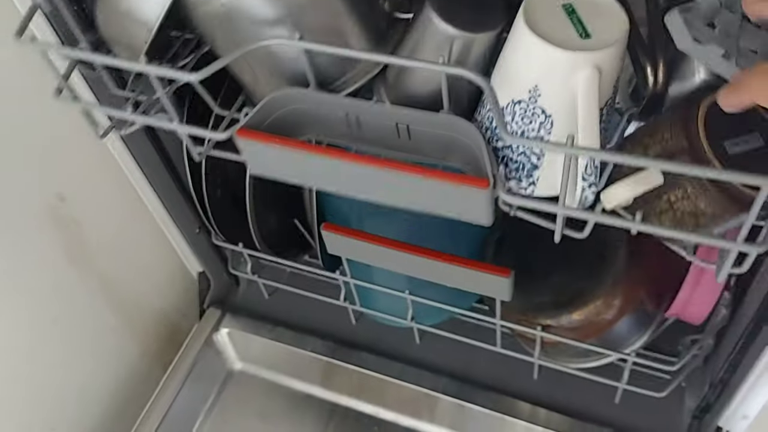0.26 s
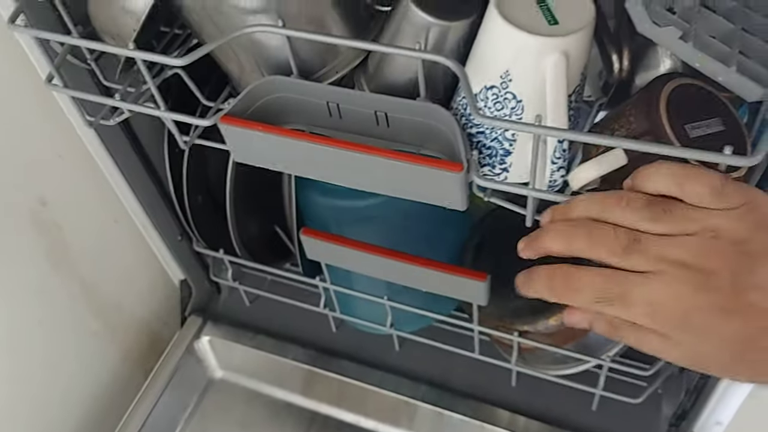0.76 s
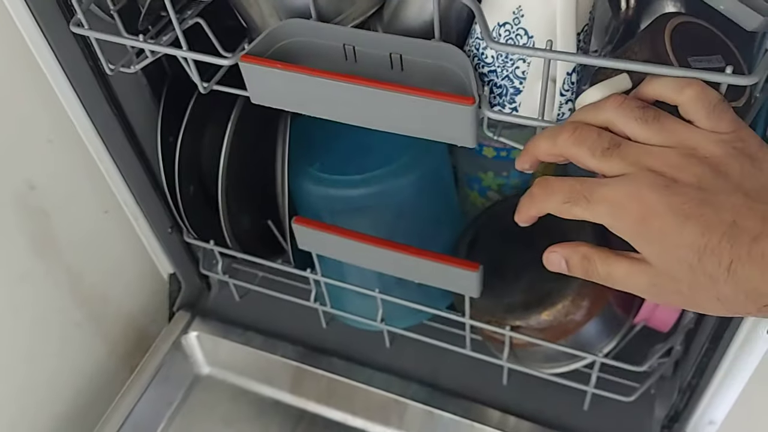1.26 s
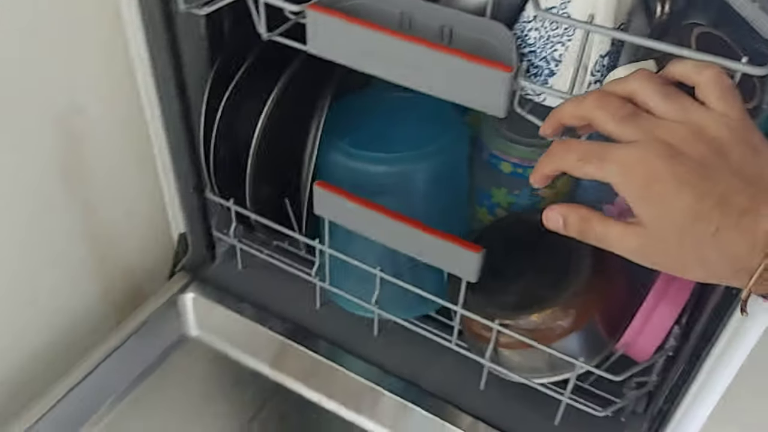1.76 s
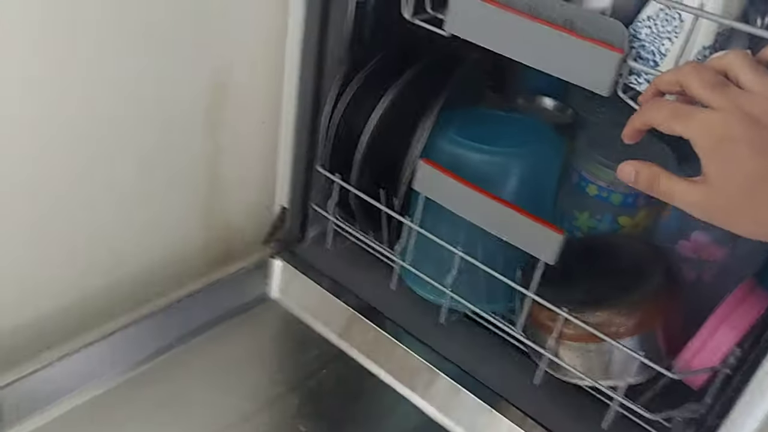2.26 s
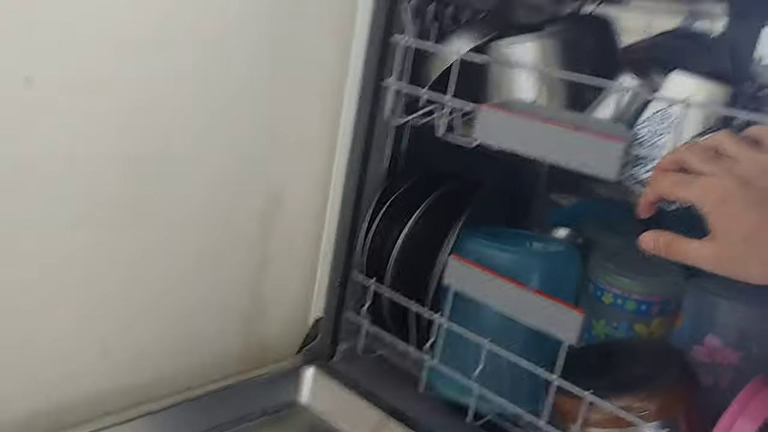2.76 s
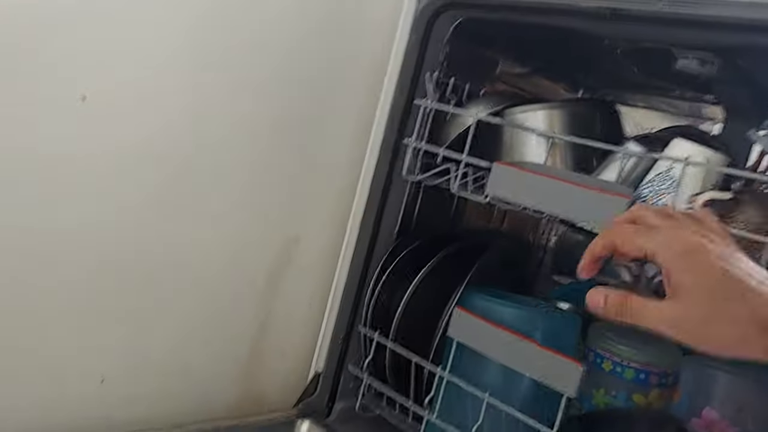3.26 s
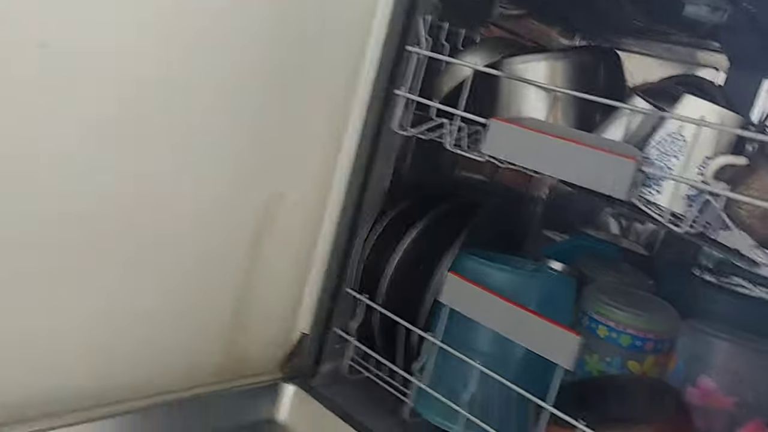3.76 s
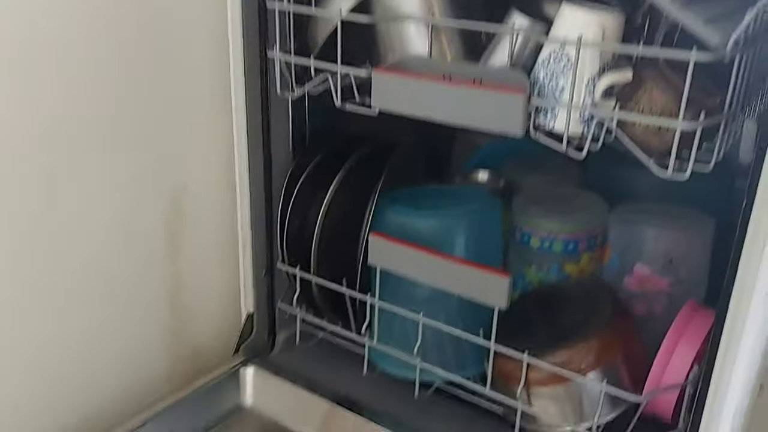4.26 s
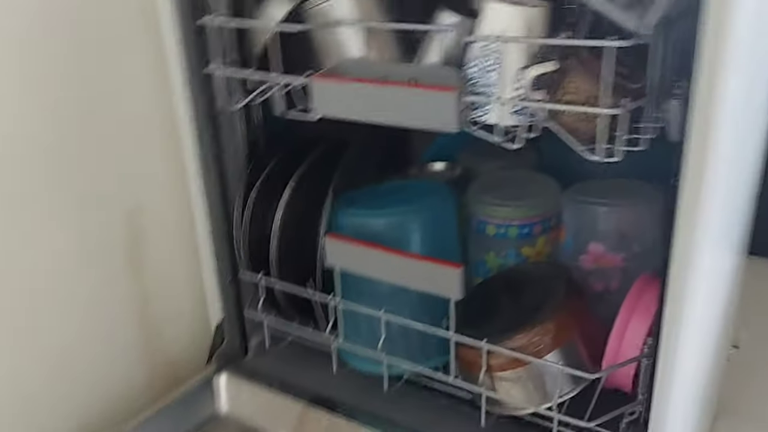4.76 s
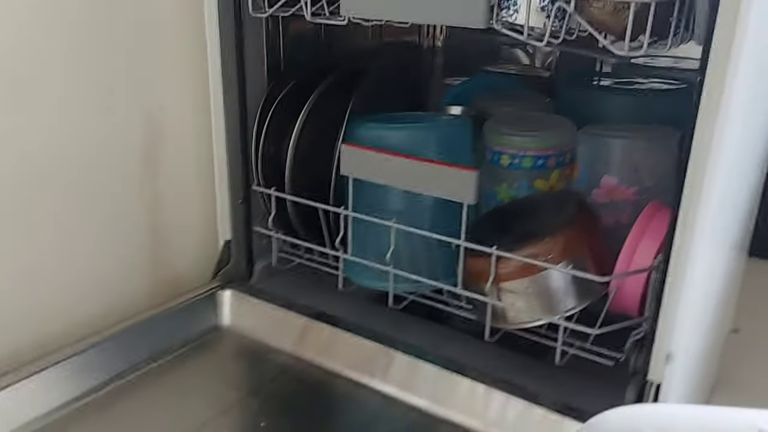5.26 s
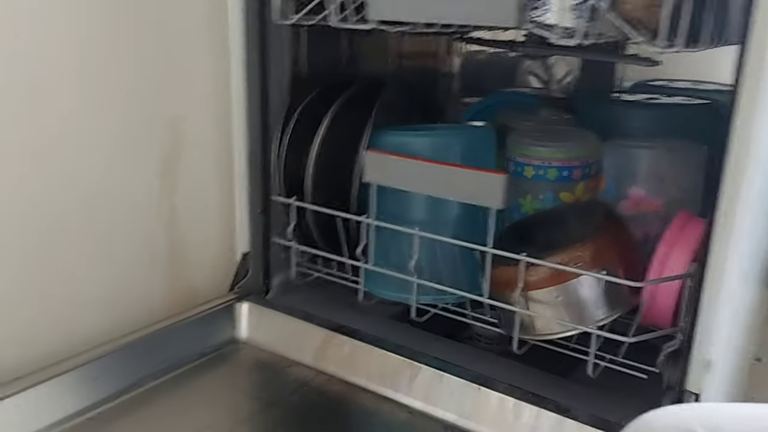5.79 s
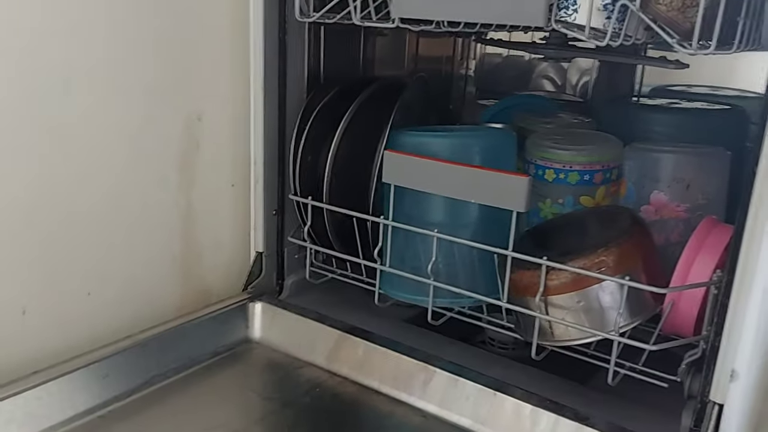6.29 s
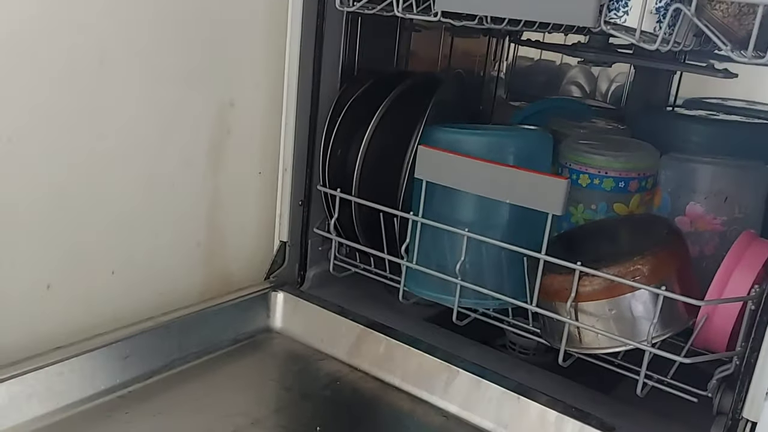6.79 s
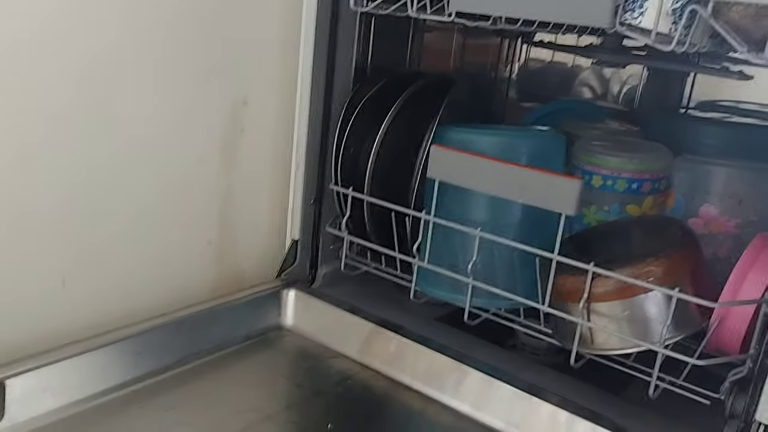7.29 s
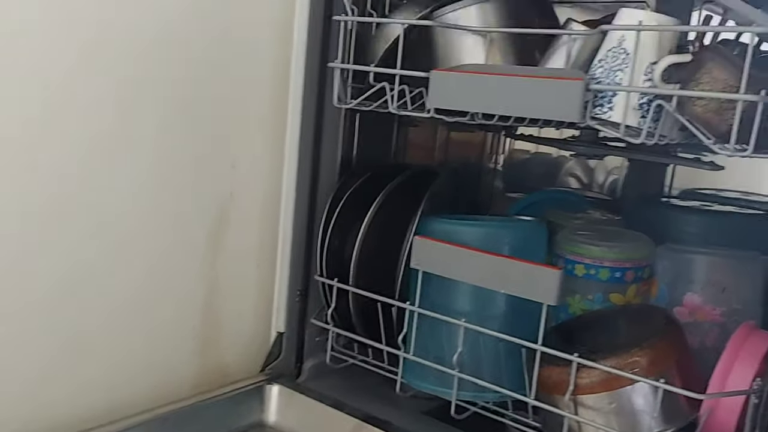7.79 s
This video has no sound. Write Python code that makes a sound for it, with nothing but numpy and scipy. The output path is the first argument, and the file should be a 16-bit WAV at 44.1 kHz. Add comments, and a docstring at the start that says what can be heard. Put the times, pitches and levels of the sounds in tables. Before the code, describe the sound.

Wire rack full of dishes rumbles and bangs home with a deep tub boom, followed by scattered steel clunks, ringing pan knocks and small clicks.

```python
"""Loading a dishwasher

A loaded wire dish rack rolls in, scrapes, and bumps against its stop with a boom of the tub.
Sheet steel clunks, a pan clangs, small parts click, and two sharp clacks ring in a hard-walled kitchen.
Blows are noise bursts shaped by a body's spectrum, some with dying sines; friction is grainy noise.
Dishes and cutlery ring as sines; a thin hiss, a hum and soft room noise lie under it, in close stereo.
"""
import sys
import numpy as np
from scipy import signal
from scipy.fft import rfft, irfft, next_fast_len
from scipy.io import wavfile
from scipy.ndimage import uniform_filter1d

SR = 44100
rng = np.random.default_rng(int(sys.argv[2]) if len(sys.argv) > 2 else 0)


def put_to_file(sound):
    """Save the sound as 16-bit audio at rate SR, in the file named by the first command-line argument."""
    columns = np.atleast_2d(sound).T  # one column per channel
    safe = np.clip(columns, -1, 1)
    whole_steps = np.round(safe * 32767)
    wavfile.write(sys.argv[1], SR, whole_steps.astype(np.int16))


N = 354563

# Room noise spectrum. Each row: frequency in Hz, relative level in dB per Hz.
FLOOR_SPECTRUM = [(15, -43.5), (25, -35), (59, 3.5), (97, -6), (149, -6), (170, -20.5), (200, -6.5),
                  (229, -11), (293, -10), (575, -12.5), (659, -15), (1190, -18), (1440, -20),
                  (10700, -37.5), (16000, -53)]
FLOOR_DB = -56.5  # rms, before the swell
# Slow swell of room noise and hum. Each row: time in seconds, gain in dB.
FLOOR_SWELL = [(0, 10.5), (2.9, 3.5), (4, 3), (5.9, 2), (7.3, -1.5), (7.85, -1), (8.03, 6)]
# Mains hum. Each row: frequency in Hz, rms level in dB before the swell.
HUM = [(149, -77), (201, -71.5), (300, -72.5)]
# Decay of the kitchen's reflections. Each row: frequency in Hz, t60 in seconds.
KITCHEN_DECAY = [(60, 0.64), (200, 0.54), (500, 0.49), (1000, 0.46), (2500, 0.47), (6000, 0.48),
                 (15000, 0.36)]
# Likeness of the two channels. Each row: frequency in Hz, likeness from 0 to 1.
STEREO_LIKENESS = [(60, 0.79), (150, 0.77), (300, 0.92), (480, 0.3), (700, 0.28), (1400, 0),
                   (16000, 0.0092)]

# Thin high hiss, faint and steady at first, with stronger short swells.
# Each row: start in seconds, length in seconds, rms level in dB.
HISS_STRETCHES = [(0, 3.24, -69), (3.45, .85, -68.5), (4.55, 0.11, -59), (4.89, 0.5, -54.5),
                  (5.21, 0.022, -49), (5.42, 0.14, -52), (5.65, 0.29, -68.5), (6.78, 0.29, -57)]
HISS_ATTACK_S, HISS_RELEASE_S = 0.0089, 0.031
# Stiff rubs. Each row: peak time, rise and fall in seconds, level at the peak in dB, hardness in dB.
RUBS = [(1.974, 0.0039, 0.049, -44.5, 18), (2.014, 0.0046, 0.03, -42.5, 11),
        (2.055, 0.0088, 0.046, -44, 13), (6.885, 0.013, 0.063, -48.5, 12), (6.99, .07, 0.1, -42.5, 2),
        (7.08, 0.042, 0.071, -45.5, 3.5)]
# Scrapes and scuffs. Each row: peak time, rise and fall in seconds, level at the peak in dB, hardness in dB.
STROKES = [(0.514, .0012, 0.027, -39, 2.5), (0.615, 0.074, 0.098, -35, 4), (1.573, .003, 0.22, -47.5, 4.5),
           (1.755, 0.11, 0.083, -39.5, 1), (6.37, 0.04, 0.2, -37.5, 3.5)]
# Stick-slip squeaks. Each row: start in seconds, length in seconds, pitch in Hz, peak level in dB,
# rms unsteadiness as a share of the pitch.
SQUEAKS = [(0.555, 0.039, 590, -38.5, 0.047), (0.864, 0.04, 523, -28.5, 0.069),
           (0.93, 0.015, 370, -32, 0.02), (0.941, 0.026, 455, -37, 0.018),
           (2.227, 0.052, 338, -33.5, 0.092)]

# Dishes touching. Each row: start in seconds, level in dB before the mode levels, lowest mode in Hz,
# t60 of that mode in seconds.
CLINKS = [(0.001, -42.5, 1660, 0.26), (0.004, -48.5, 2840, 0.48), (0.245, -43, 7000, 0.16),
          (2.36, -52, 2590, 0.21), (4.666, -47, 2290, 0.055), (4.874, -38, 1567, .07),
          (4.969, -31.5, 1497, 0.064)]
# Modes of a dish. Each row: multiple of the lowest mode, relative level in dB.
DISH_MODES = [(1, 6), (1.016, -8), (1.19, -9), (1.474, -7.5), (2.56, -25)]
# Every jolt rings a mug; its level is relative to the jolt, plus MUG_PER_HARDNESS dB per dB of hardness.
MUG_HZ, MUG_SCATTER, MUG_T60_S, MUG_DB, MUG_PER_HARDNESS = 2566, 0.0273, 0.21, -20.5, 1
# Cutlery level relative to the jolts and to the rolling rumble.
CUTLERY_JOLT_DB, CUTLERY_ROLL_DB, CUTLERY_SETTLE_S = -25, -18, .1

# Blows share one layout. Each row: start in seconds, rms level of the first 30 ms in dB, hardness in dB.
# Small dry clicks close by, rows as above.
CLICKS = [(0.246, -45.5, 18), (0.451, -48, -7), (2.011, -53, -5), (2.228, -51.5, -1), (4.667, -46.5, -12),
          (5.533, -39, -8.5), (5.56, -54, 9), (5.688, -33.5, -12)]
# A woody knock, rows as above.
KNOCKS = [(7.89, -35.5, 1.5)]
# A bright snap out in the room, rows as above.
SNAPS = [(6.393, -29, 4.5), (6.399, -19, -6), (6.413, -24.5, -8)]
# Hard clacks with a hollow ring, rows as above.
CLACKS = [(6.1528, -26.5, -4.5), (6.1608, -24.5, 3)]
# A steel pan is knocked, or lands and chatters, rows as above.
CLANGS = [(2.411, -29, -14), (4.1015, -24.5, 8.5), (4.111, -25.5, -5), (4.125, -25, 7), (4.135, -23, -8),
          (4.617, -39, -3), (4.976, -31.5, -1)]
# Clunks of sheet steel, rows as above.
CLUNKS = [(0.453, -41.5, -38), (0.906, -38.5, -10), (2.228, -43, -11), (2.404, -26.5, 1.5),
          (2.504, -34, 11), (2.531, -37, 16), (2.585, -34, -8), (2.608, -33.5, -3), (4.503, -30.5, 6.5),
          (4.615, -42, 3), (4.664, -40.5, 6), (4.873, -34, 13.5), (4.969, -26, 3)]
# Jolts of the loaded rack, hardest at its stop, with a weaker one later, rows as above.
JOLTS = [(0.002, -35.5, 6), (0.108, -37, -23), (0.244, -37, -12), (0.276, -40.5, -28), (0.35, -34, -8.5),
         (1.085, -37.5, -10), (1.115, -20.5, 11), (1.143, -23, -4.5), (1.177, -34.5, -19), (2.28, -39, -22)]
# Treble follows hardness; the middle gets this share of it.
MIDDLE_SHARE = 0.34
# Each clunk rebounds at once, then settles in duller, weaker taps.
REBOUND_S, REBOUND_DB, REBOUND_HARDNESS_DB = .007, -2.2, -18.5
SETTLE_GAP_S, SETTLE_DB_PER_TAP = .036, -8.5

# Rolling on the wheels. Each row: start in seconds, length in seconds, rumble rms in dB,
# squeal amplitude in dB before its flutter.
ROLLS = [(0, 0.319, -37.5, -60.5), (0.96, 0.2, -56.5, -67), (2.269, .12, -44, -90)]
ROLL_ATTACK_S, ROLL_RELEASE_S = 0.011, 0.025
SQUEAL_HZ = 9100

# Body spectra share one layout. Each row: frequency in Hz, relative level in dB per Hz.
# Thin high hiss, rows as above.
HISS_SPECTRUM = [(100, -11), (2000, -6.5), (5500, -5.5), (7400, 2), (9500, -3.5), (16000, -5.5)]
# Stiff rub, rows as above.
RUB_SPECTRUM = [(35, -23), (60, 2), (150, -7.5), (260, -3), (480, -3.5), (750, -5), (1000, -3), (1120, -5),
                (1800, -6.5), (2500, -11), (7000, -30.5), (16000, -41)]
# Scuffs and wheel rumble, rows as above.
SCUFF_SPECTRUM = [(30, -12), (80, 8.5), (200, -3), (600, 1), (1200, -7.5), (2500, -9), (4500, -15),
                  (7500, -20), (16000, -30)]
# Small plastic parts, rows as above.
PLASTIC_SPECTRUM = [(40, -9), (150, 0), (500, -6), (1200, -23), (2300, -14.5), (3500, -7.5), (5500, -12),
                    (7500, -11), (10000, -14.5), (16000, -21.5)]
# Woody body, rows as above.
WOODY_SPECTRUM = [(35, -19), (70, -6), (370, -4), (503, -2.5), (682, -13), (862, -1.5), (1170, -17.5),
                  (1740, -12.5), (2400, -17), (3340, -6), (3760, -16), (4120, -12), (5330, -21),
                  (16000, -49)]
# Bright snapping body, rows as above.
BRIGHT_SPECTRUM = [(100, -39.5), (350, -14.5), (650, -0.5), (1000, -12.5), (1600, -6.5), (2700, 3),
                   (4000, 5), (6000, 3), (7400, 7.5), (9500, 5), (16000, 1.5)]
# Hollow body, rows as above.
HOLLOW_SPECTRUM = [(100, -31.5), (500, -19.5), (1300, -13), (1800, -2.5), (2150, 5), (2600, -2.5),
                   (3600, -8.5), (5500, -9), (8000, -20), (16000, -19.5)]
# Steel pan, rows as above.
PAN_SPECTRUM = [(40, -30), (120, -28), (170, -6.5), (230, -19), (350, -6), (450, -12.5), (800, -1.5),
                (1050, 5.5), (1200, -8), (1550, -11), (1800, -21), (2350, -15.5), (3200, -25.5),
                (6000, -34.5), (7400, -34), (9000, -39), (16000, -50)]
# Sheet steel, rows as above.
STEEL_SPECTRUM = [(40, -22), (90, -7.5), (135, -12), (190, 2), (250, -8), (340, 3), (450, -5.5), (570, -1),
                  (740, -1), (880, -5.5), (1030, -6.5), (1300, -10), (1600, -13.5), (1950, -17),
                  (2500, -20.5), (3500, -25.5), (6000, -37.5), (7300, -26.5), (9000, -37.5), (16000, -42.5)]
# Loaded wire rack, rows as above.
RACK_SPECTRUM = [(30, -16), (80, 4.5), (125, -9.5), (170, 1), (215, -2.5), (330, -3), (600, -4), (1000, -9),
                 (1400, -17), (2200, -13.5), (2600, -11.5), (3200, -14), (6000, -29), (7400, -25.5),
                 (9000, -34), (16000, -33)]

# Ringing modes of the pan. Each row: frequency in Hz, relative level in dB, t60 in seconds.
PAN_MODES = [(162, -21, 0.36), (349.5, -8.5, 0.59), (535, -7.5, 0.54), (670, -7, 0.66), (880, -22, 0.35),
             (964, -0.5, 0.43), (990, 0, .4), (1020, 6, 0.28), (1078, -3.5, .38), (1116, 1.5, 0.45),
             (1330, -12, 0.27), (2159, -4.5, 0.14), (2380, -5, 0.25), (2670, -16, 0.24)]
# Ringing modes of sheet steel. Each row: frequency in Hz, relative level in dB, t60 in seconds.
STEEL_MODES = [(167.2, -4.5, 0.58), (197.6, 0, 0.82), (313, -3, 0.68), (352.3, 11.5, 0.41),
               (347, -11, 0.89), (529, -1, 0.64), (620, 8, 0.32), (639, 7, 0.44), (740, 13.5, 0.39),
               (970, -15, 0.64), (1022, 15, 0.33)]
# Ringing modes of the rack. Each row: frequency in Hz, relative level in dB, t60 in seconds.
RACK_MODES = [(170, -24, .2), (205.6, -1, 0.27), (268.3, 9.5, 0.52), (593, 4, 0.45), (635, 5, 0.3),
              (770, -18, 0.33)]
# Boom of the tub. Each row: frequency in Hz, level in dB relative to the jolt.
TUB_MODES = [(44, -7), (68.7, 6.5), (86, -13.5)]

EDGE_HZ = 15950  # upper band limit of the recorder


def gain_of(db):
    """Decibels to a factor."""
    return 10 ** (np.asarray(db) / 20)


def rms(x):
    """Root mean square."""
    return np.sqrt(np.mean(x ** 2) + 1e-20)


def read(points, hz):
    """Joins (Hz, value) points on a log-frequency axis."""
    f, value = np.transpose(points)
    return np.interp(np.log(hz + 1), np.log(f + 1), value)


def add(mix, s, sound):
    """Mixes a sound in at time s."""
    part = mix[:, max(round(s * SR), 0):][:, :sound.shape[-1]]
    part += sound[..., :part.shape[1]]


def held(rows, attack_s, release_s):
    """Level of sounds (start s, length s, dB) that get going, hold and die away."""
    t = np.arange(N) / SR
    level = np.zeros(N)
    for s, length, db in rows:
        attack = np.clip((t - s) / attack_s, 0, 1)
        release = np.exp(-np.maximum(t - s - length, 0) / release_s)
        level += gain_of(db) * attack * release
    return level


def diffuse(size):
    """White noise at two microphones: alike in the bass, unrelated in the treble."""
    a, b = rfft(rng.standard_normal((2, size)))
    same = np.clip(read(STEREO_LIKENESS, np.fft.rfftfreq(size, 1 / SR)), -1, 1)
    mid = a * np.sqrt((1 + same) / 2)
    side = b * np.sqrt((1 - same) / 2)
    return irfft([mid + side, mid - side], size)


def colour(x, spectrum, size=4096):
    """Causal, minimum-phase filter of unit energy with the given spectrum."""
    log_gain = np.log(gain_of(read(spectrum, abs(np.fft.fftfreq(size, 1 / SR)))))
    taps = np.fft.ifft(np.exp(np.conj(signal.hilbert(log_gain)))).real[:size // 2]
    return signal.fftconvolve(x, taps[None] / np.linalg.norm(taps), axes=1)[:, :x.shape[1]]


def tint(x, hardness_db, bass_db, middle_db):
    """A harder touch brightens the sound; bass and middle depend on where the body is touched."""
    middle = middle_db + MIDDLE_SHARE * hardness_db
    return colour(x, [(90, bass_db), (380, 0.0011), (620, middle / 2), (1050, middle), (4000, hardness_db)])


def uneven(spectrum, ripple_db):
    """A body has many small resonances on top of its broad spectrum: random ripple, less in the bass."""
    hz = np.arange(0, SR / 2, 10)
    coarse = hz[::5]
    ripple = np.interp(hz, coarse, rng.standard_normal(len(coarse))) * np.minimum(hz / 1500, 1)
    return np.column_stack([hz, read(spectrum, hz) + ripple_db * ripple])


def room_tail(size):
    """Dense reflections, each band dying at its own speed."""
    hz, t, bands = signal.stft(diffuse(size), SR, nperseg=256)
    decay = gain_of(-60 * t / read(KITCHEN_DECAY, hz)[:, None])
    return signal.istft(bands * decay, SR)[1][:, :size]


def ringing(modes, t):
    """Dying sines; the high ones reach the two microphones out of step."""
    out = np.zeros((2, len(t)))
    for hz, db, t60 in modes:
        phase, skew = rng.uniform(-np.pi, np.pi, 2)
        skew *= (1 - read(STEREO_LIKENESS, hz)) / 2
        tone = np.sin(2 * np.pi * hz * t + phase + np.array([[skew], [-skew]]))
        out += gain_of(db - 60 * t / t60) * tone
    return out


def blows(rows, spectrum, bass_db, middle_db, pan_db, rise_s, contact_s, room_db, ripple_db,
          modes=(), modes_db=0, size=28672):
    """Each blow: a short noise burst of contact, the body's modes and the room, levelled on its first 30 ms."""
    out, t = np.zeros((2, N)), np.arange(size) / SR
    head = round(.03 * SR)
    body = uneven(spectrum, ripple_db)
    for s, db, hardness_db in rows:
        contact = diffuse(size) * np.exp(-t / contact_s)
        noise = contact + gain_of(room_db) * room_tail(size)
        sound = colour(noise * (1 - np.exp(-t / rise_s)), body)
        sound = tint(sound + gain_of(modes_db) * ringing(modes, t), hardness_db, bass_db, middle_db)
        sides = gain_of([[db + pan_db / 2], [db - pan_db / 2]])  # positive pan leans left
        add(out, s, sides * sound / rms(sound[:, :head]))
    return out


def rubbing(rows, spectrum, bass_db, middle_db, grain_db, slips_per_s, ripple_db):
    """Each stroke swells and fades; tiny uneven slips make it grainy."""
    out, body = np.zeros((2, N)), uneven(spectrum, ripple_db)
    for s, rise, fall, db, hardness_db in rows:
        start = max(s - 2 * rise, 0)
        t = start + np.arange(next_fast_len(int((s + 3 * fall - start) * SR))) / SR
        slips = np.interp(t * slips_per_s % 4096, np.arange(4096), rng.standard_normal(4096))
        grainy = diffuse(2 ** 17)[:, :len(t)] * gain_of(grain_db * slips)
        sound = tint(colour(grainy, body), hardness_db, bass_db, middle_db)
        pressure = np.exp(-((t - s) / np.where(t < s, rise, fall)) ** 2)
        add(out, start, gain_of(db) * pressure * sound / rms(sound))
    return out


def grainy_noise(spectrum, grain_db, ripple_db):
    """Continuous noise with a finely uneven level, coloured by a spectrum."""
    grain = uniform_filter1d(rng.standard_normal(N), size=120)
    noise = diffuse(next_fast_len(N))[:, :N] * gain_of(grain_db * grain / rms(grain))
    return colour(noise, uneven(spectrum, ripple_db))


def background(wander_db):
    """Room noise that wanders very slightly and a faint mains hum, both under one slow swell."""
    t = np.arange(N) / SR
    wander = sum(np.sin(2 * np.pi * (f * t + rng.random())) / np.sqrt(f) for f in np.geomspace(1, 9, 12))
    air = colour(diffuse(next_fast_len(N)), FLOOR_SPECTRUM)[:, :N]
    air = air * gain_of(wander_db * wander / rms(wander))
    hum = np.zeros(N)
    for hz, db in HUM:
        hum += gain_of(db) * np.sqrt(2) * np.sin(2 * np.pi * (hz * t + rng.random()))
    swell = gain_of(np.interp(t, *np.transpose(FLOOR_SWELL)))
    return (gain_of(FLOOR_DB) * air / rms(air) + hum) * swell


def thin_hiss():
    """Thin, finely grained high hiss, faint and steady at first, with stronger short swells."""
    hiss = grainy_noise(HISS_SPECTRUM, grain_db=0.5, ripple_db=4.0)
    return hiss / rms(hiss) * held(HISS_STRETCHES, HISS_ATTACK_S, HISS_RELEASE_S)


def stiff_rubs():
    """Stiff rubs: coarse, slow slips that colour the noise with the rubbed body."""
    return rubbing(RUBS, RUB_SPECTRUM, bass_db=1.0, middle_db=-1.2, grain_db=1.0, slips_per_s=370,
                   ripple_db=3.0)


def scrapes():
    """Scrapes and soft scuffs: strokes of quicker slips on a bass-heavy body."""
    return rubbing(STROKES, SCUFF_SPECTRUM, bass_db=-3, middle_db=3.2, grain_db=1.5, slips_per_s=700,
                   ripple_db=3.0)


def squeaks():
    """Stick and slip on the rails: short unsteady tones."""
    out = np.zeros((2, N))
    for s, length, hz, db, unsteady in SQUEAKS:
        waver = uniform_filter1d(rng.standard_normal(SR), size=60)[:int(length * SR)]
        turns = np.cumsum(hz * (1 + unsteady * waver / rms(waver))) / SR
        add(out, s, gain_of(db) * signal.windows.tukey(len(turns), .5) * np.sin(2 * np.pi * turns))
    return out


def cutlery_rattle(ticks_per_s, low_hz, high_hz, spread_db, count=40):
    """Cutlery and coated wires tick at random as the rack rolls or is jolted, each with its own pitch."""
    span = 3 * SR
    out, t = np.zeros((2, N)), np.arange(SR // 4) / SR
    for hz in np.geomspace(low_hz, high_hz, count) * rng.uniform(.95, 1.05, count):
        struck = rng.random(span) < ticks_per_s / count / SR
        ticks = struck * gain_of(spread_db * rng.standard_normal(span))
        t60 = 45 / hz  # higher pieces die sooner
        add(out, 0, signal.fftconvolve(ticks[None], ringing([(hz, 0, t60)], t), axes=1))
    jolted = held([(s, 0, db + CUTLERY_JOLT_DB) for s, db, _ in JOLTS], ROLL_ATTACK_S, CUTLERY_SETTLE_S)
    return out / rms(out[:, :span]) * np.hypot(jolted, gain_of(CUTLERY_ROLL_DB) * roll_level())


def clinks():
    """Dishes ring with close and far modes, the higher dying sooner; hard jolts ring the mug most."""
    out, t = np.zeros((2, N)), np.arange(SR // 2) / SR
    mug = []
    for s, db, hardness_db in JOLTS:
        mug_db = db + MUG_DB + MUG_PER_HARDNESS * hardness_db
        mug.append((s, mug_db, MUG_HZ * (1 + MUG_SCATTER * rng.uniform(-1.15, 1)), MUG_T60_S))
    for s, db, hz, t60 in CLINKS + mug:
        modes = [(hz * k, db + mode_db, t60 / k) for k, mode_db in DISH_MODES if hz * k < SR / 2]
        add(out, s, ringing(modes, t))
    return out


def plastic_clicks():
    """Small parts click: brief contact and little room."""
    return blows(CLICKS, PLASTIC_SPECTRUM, bass_db=4, middle_db=14.5, pan_db=0.3, rise_s=0.001,
                 contact_s=0.006, room_db=-18.0, ripple_db=3.5)


def woody_knock():
    """A woody knock: a fast, dry contact coloured by the body's resonances."""
    return blows(KNOCKS, WOODY_SPECTRUM, bass_db=-2.0, middle_db=3, pan_db=-2.0, rise_s=0.00014,
                 contact_s=0.0036, room_db=-22, ripple_db=1.5)


def bright_snaps():
    """A bright snap: contact under a millisecond, followed by the room."""
    return blows(SNAPS, BRIGHT_SPECTRUM, bass_db=15.5, middle_db=0.3, pan_db=.4, rise_s=.0001,
                 contact_s=0.0006, room_db=-7, ripple_db=1.0)


def hollow_clacks():
    """Hard clacks: a sudden contact on a hollow body, with a strong room tail."""
    return blows(CLACKS, HOLLOW_SPECTRUM, bass_db=-1.5, middle_db=0.8, pan_db=-.2, rise_s=.0002,
                 contact_s=.015, room_db=7.5, ripple_db=1.0)


def pan_clangs():
    """A steel pan clangs: short contact sets a cluster of modes ringing."""
    return blows(CLANGS, PAN_SPECTRUM, bass_db=5.0, middle_db=-2.4, pan_db=0.7, rise_s=0.00061,
                 contact_s=0.0078, room_db=-11, ripple_db=3, modes=PAN_MODES, modes_db=-18.5)


def clatter(count=2):
    """Each clunk, its rebound and the unevenly spaced taps with which the steel settles."""
    rows = []
    for s, db, hardness_db in CLUNKS:
        dull = hardness_db + REBOUND_HARDNESS_DB
        taps = s + np.cumsum(SETTLE_GAP_S * rng.uniform(.75, 1.25, count))
        rows += [(s, db, hardness_db), (s + REBOUND_S, db + REBOUND_DB, dull)]
        rows += [(at, db + k * SETTLE_DB_PER_TAP, dull) for k, at in enumerate(taps, 1)]
    return rows


def steel_clunks():
    """Sheet steel clunks, rebounds and settles, its low modes ringing on."""
    return blows(clatter(), STEEL_SPECTRUM, bass_db=1.5, middle_db=-1, pan_db=0.4, rise_s=0.0013,
                 contact_s=0.016, room_db=-6.5, ripple_db=2.5, modes=STEEL_MODES, modes_db=-25.5)


def tub_boom(build_s, t60):
    """Each jolt booms in the tub: its wall takes a moment to swing up, then dies away."""
    out, t = np.zeros((2, N)), np.arange(SR) / SR
    swing = (1 - np.exp(-(t / build_s) ** 2)) * gain_of(-60 * t / t60)
    tones = sum(gain_of(db) * np.sin(2 * np.pi * hz * t) for hz, db in TUB_MODES)
    boom = swing / swing.max() * tones
    for s, db, _ in JOLTS:
        add(out, s, gain_of(db) * boom)
    return out


def roll_level():
    """How strongly the rack is rolling."""
    return held([(s, length, db) for s, length, db, _ in ROLLS], ROLL_ATTACK_S, ROLL_RELEASE_S)


def wheel_squeal(unsteady, flutter_db):
    """A thin note, wavering in pitch and level, sounds during the first two rolls."""
    waver, flutter = uniform_filter1d(rng.standard_normal((2, N)), size=160)
    turns = np.cumsum(SQUEAL_HZ * (1 + unsteady * waver / rms(waver))) / SR
    level = held([(s, length, db) for s, length, _, db in ROLLS], attack_s=0.1, release_s=0.017)
    return level * gain_of(flutter_db * flutter / rms(flutter)) * np.sin(2 * np.pi * turns)


def wheel_rumble():
    """The wheels rumble over the rails during each roll."""
    rumble = grainy_noise(SCUFF_SPECTRUM, grain_db=1.5, ripple_db=3.5)
    rumble = tint(rumble, hardness_db=-5, bass_db=7.5, middle_db=-5)
    return roll_level() * rumble / rms(rumble)


def rack_jolts():
    """Jolts of the loaded rack, hardest at its stop: a long, bass-heavy contact with ringing modes."""
    return blows(JOLTS, RACK_SPECTRUM, bass_db=11.5, middle_db=5.5, pan_db=1.5, rise_s=0.0017,
                 contact_s=0.025, room_db=-6.5, ripple_db=2.0, modes=RACK_MODES, modes_db=-19)


def scene():
    """All sources at the microphone."""
    soft = background(wander_db=-0.02) + thin_hiss()
    friction = stiff_rubs() + scrapes() + squeaks()
    dishes = clinks() + cutlery_rattle(ticks_per_s=1300, low_hz=1100, high_hz=8400, spread_db=-2.5)
    small_hits = plastic_clicks() + woody_knock() + bright_snaps() + hollow_clacks()
    metal_hits = pan_clangs() + steel_clunks()
    wheels = wheel_squeal(unsteady=0.0124, flutter_db=1.5) + wheel_rumble()
    rack = rack_jolts() + tub_boom(build_s=0.011, t60=0.44)
    return soft + friction + dishes + small_hits + metal_hits + wheels + rack


def record(dry):
    """The recorder's band limit."""
    low_pass = signal.firwin(511, EDGE_HZ, window=("kaiser", 9), fs=SR)
    return signal.oaconvolve(dry, low_pass[None], "same")


dry = scene()
out = record(dry)
put_to_file(out)
```